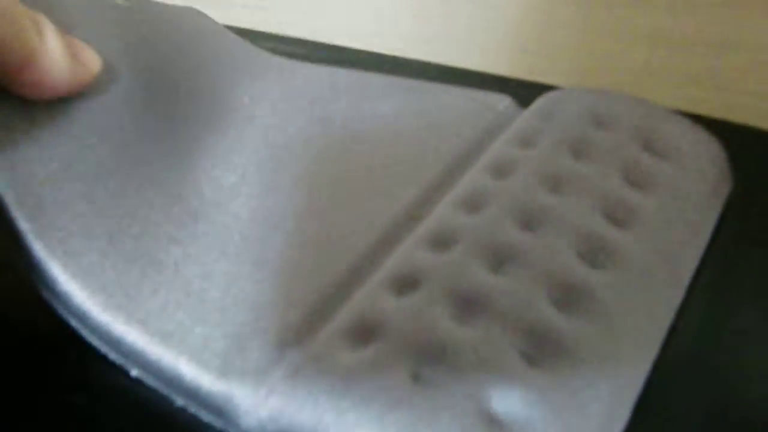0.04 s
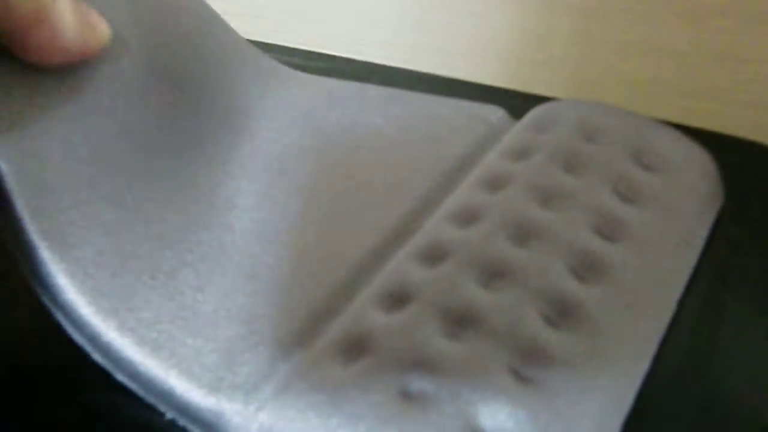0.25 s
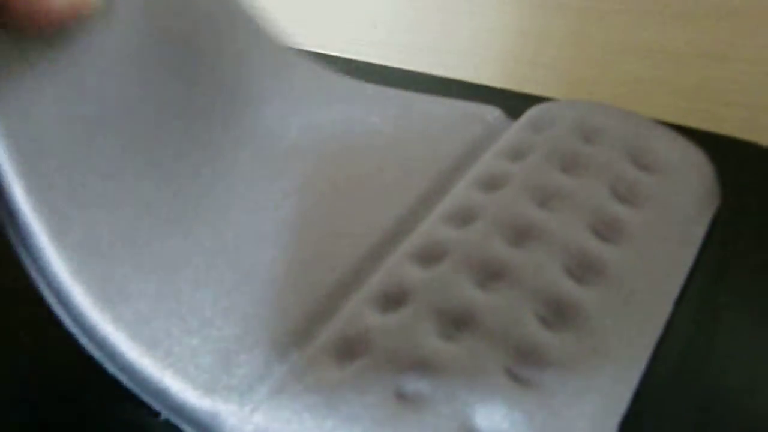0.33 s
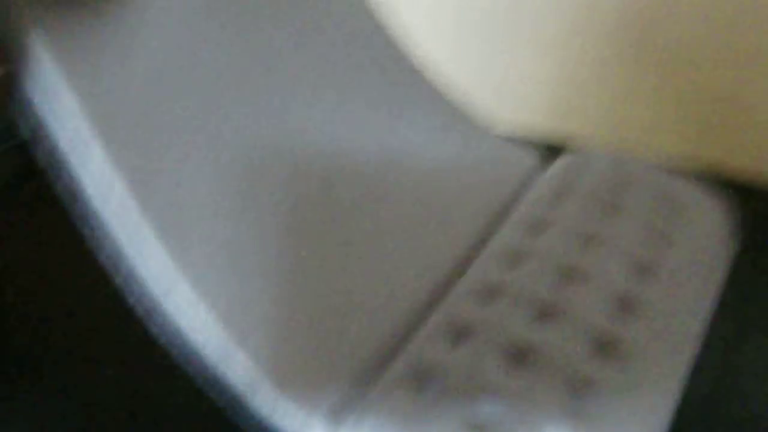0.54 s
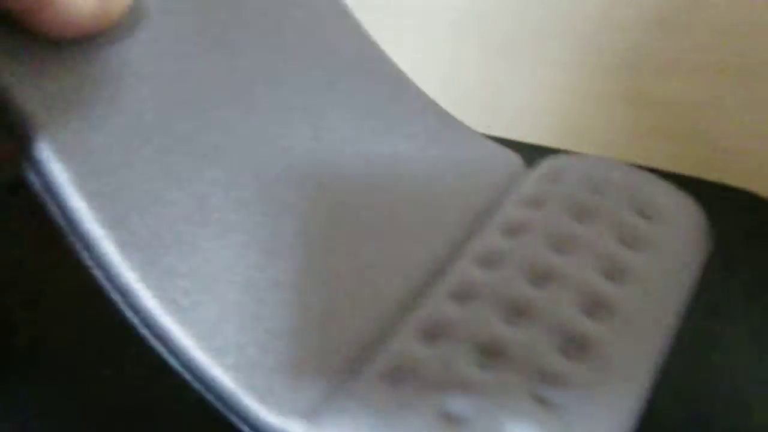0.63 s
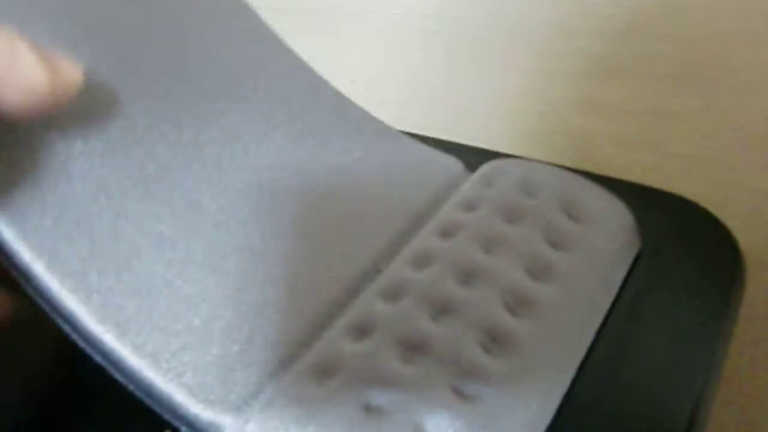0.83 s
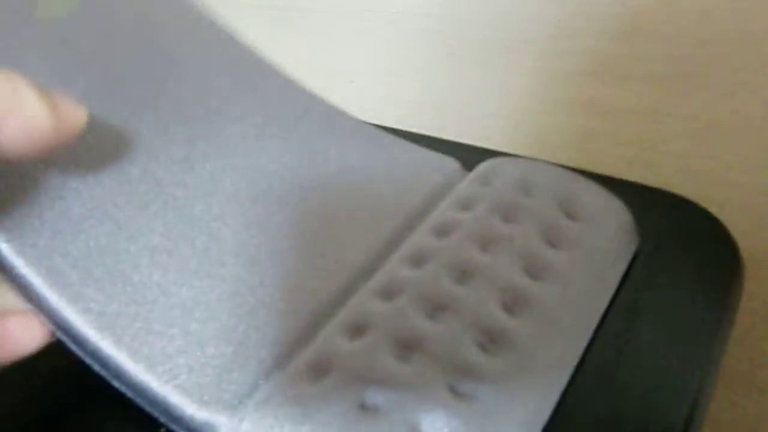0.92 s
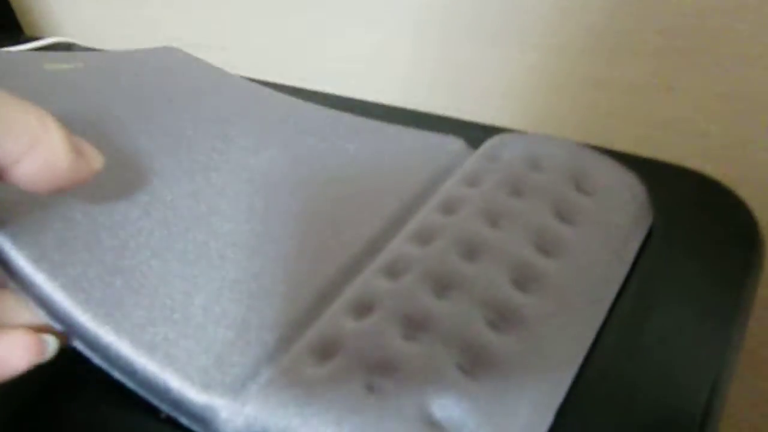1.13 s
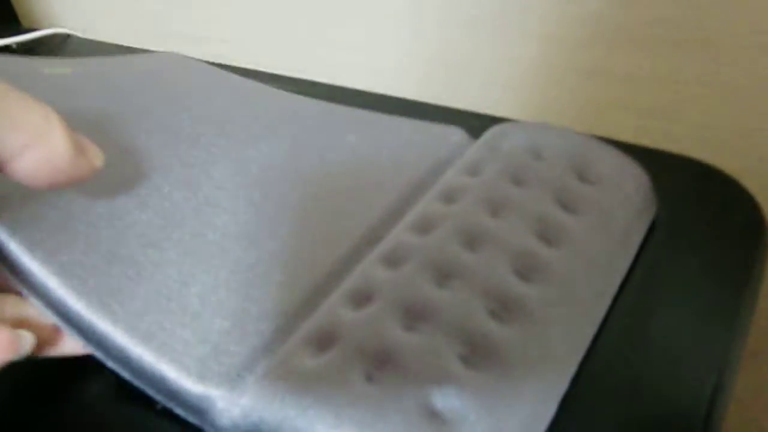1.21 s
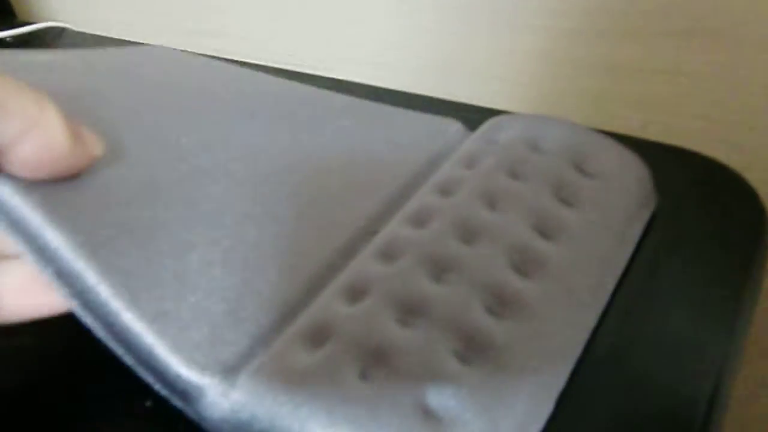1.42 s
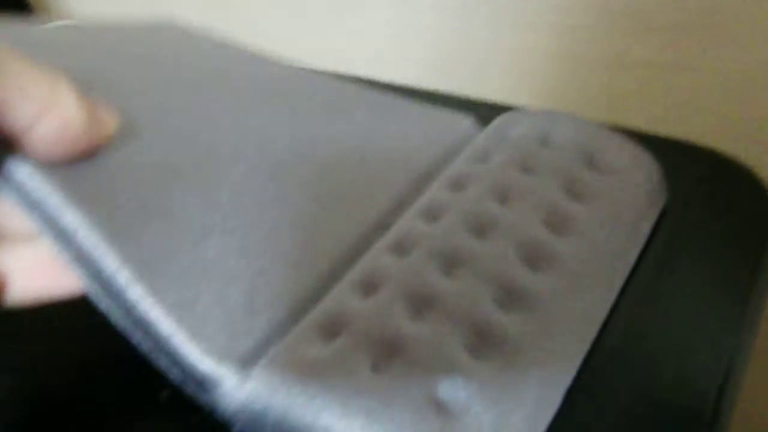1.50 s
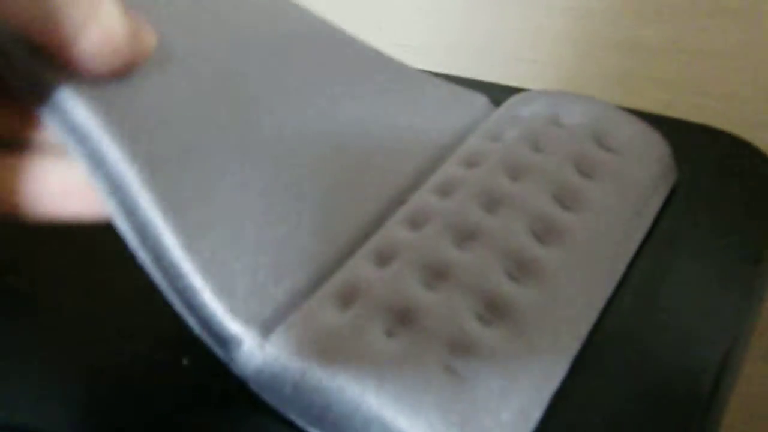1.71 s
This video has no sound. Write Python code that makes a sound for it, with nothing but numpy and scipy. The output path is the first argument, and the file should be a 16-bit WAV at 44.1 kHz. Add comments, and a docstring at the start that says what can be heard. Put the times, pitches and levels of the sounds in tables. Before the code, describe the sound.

A flexible mouse pad ticks as a hand bends it, then buckles with one loud, crackly snap. Faint rustling follows, then a few light taps and a soft thud, close by in a small room with a humming fan.

```python
"""Buckling of a mouse pad.

A hand bends a flexible pad on a desk. Its strained skin ticks, then buckles in a burst of cracks with
one loud snap, and the loose sheet flaps. Friction makes it rustle and faintly squeak; it taps, scuffs
and thuds as it is let down. A small room reverberates, and a fan hums throughout."""
import sys
import numpy as np
from scipy import signal
from scipy.fft import rfft, irfft, next_fast_len
from scipy.io import wavfile
from scipy.ndimage import uniform_filter1d

SR = 44100
rng = np.random.default_rng(int(sys.argv[2]) if len(sys.argv) > 2 else 0)


def output_pcm(signal):
    """Save a mono or channel-first signal as 16-bit PCM at the path in sys.argv[1].

    Samples are clipped to [-1, 1] before scaling.
    """
    pcm = np.clip(np.atleast_2d(signal).T, -1, 1) * 32767
    wavfile.write(sys.argv[1], SR, np.round(pcm).astype(np.int16))


N = 77175


def undb(db):
    """Amplitude ratio of a level in decibels."""
    return 10 ** (np.asarray(db) / 20)


def unit(x):
    """Normalisation to an rms of 1."""
    return x / np.sqrt(np.mean(x ** 2))


def clock(size=N):
    """Sample times in seconds."""
    return np.arange(size) / SR


def add(out, at_s, x):
    """Superposition of a sound from a given time."""
    i = max(int(at_s * SR), 0)
    out[i:i + len(x)] += x[:N - i]


def colour(x, spectrum):
    """Minimum-phase filter through (Hz, dB) points, made by folding the cepstrum."""
    size = next_fast_len(2 * N, True) // 2 * 2
    hz, db = np.array(spectrum, float).T
    f = np.maximum(np.arange(size // 2 + 1) * SR / size, 1)
    gain = undb(np.interp(np.log(f), np.log(hz), db))
    cepstrum = irfft(np.log(gain))
    cepstrum[1:size // 2] *= 2
    cepstrum[size // 2 + 1:] = 0
    return irfft(rfft(x, size) * np.exp(rfft(cepstrum)))[:N]


def wander(rate_hz):
    """Smooth random fluctuation with an rms of 1."""
    hold = int(SR / rate_hz)
    steps = rng.standard_normal(N)[np.arange(N) // hold]
    return unit(uniform_filter1d(uniform_filter1d(steps, hold), hold))


def ring(modes, detune, rise_s=0):
    """Free vibration: damped modes, slightly retuned by bending; a soft push builds up slowly."""
    t = clock(SR // 2)
    x = 0
    for k, (hz, db, t60) in enumerate(modes):
        bent_hz = hz * (1 + detune * rng.standard_normal())
        x += (-1) ** k * undb(db) * np.sin(2 * np.pi * bent_hz * t) * 1000 ** (-t / t60)
    return x * (1 - np.exp(-t / rise_s)) if rise_s else x


def click(trail_db, decay_s):
    """Stick-slip: one impulse and a decaying trail of tiny slips."""
    t = clock(SR // 10)
    slips = rng.standard_normal(len(t)) * undb(3.5 * rng.standard_normal(len(t)))
    trail = slips * np.exp(-t / decay_s)
    x = undb(trail_db) * trail / np.sqrt(np.sum(trail ** 2))
    x[0] -= 1
    return x


# Tones of the fan. Each row: frequency in Hz, level in dB.
FAN_TONES = [(86, -54.5), (173, -63), (231, -58), (256, -56.5), (289, -56), (332, -60.5)]
# Spectrum of its air noise. Each row: frequency in Hz, gain in dB.
AIR_SPECTRUM = [(15, -40), (25, -8.5), (58, -19.5), (70, -6), (92, -4.5), (108, -11), (170, -9), (200, -10),
                (236, 1.5), (285, -13), (335, -3.5), (363, -24.5), (405, -13), (560, -17.5), (734, -15.5),
                (1070, -24.5), (1520, -24), (2000, -28.5), (4030, -28.5), (11000, -37.5), (16000, -41)]
def fan():
    """Tonal and broadband noise: low, wavering tones over a steady flow of air."""
    drift = 1.597 / FAN_TONES[0][0]  # rms fraction of each frequency
    hum = 0
    for hz, db in FAN_TONES:
        cycles = rng.random() + np.cumsum(hz * (1 + drift * wander(25.13))) / SR
        hum += undb(db) * np.sqrt(2) * np.sin(2 * np.pi * cycles) * undb(1.1 * wander(16))
    return hum + undb(-47.5) * unit(colour(rng.standard_normal(N), AIR_SPECTRUM))


# Bands of the room's tail. Each row: centre in Hz, gain in dB, time to fall 60 dB in seconds.
ROOM_BANDS = [(120, -23, 0.68), (302, -2.5, 0.46), (620, -6, 0.43), (1190, -6.5, 0.41), (1660, -6.5, 0.47),
              (3240, -8.5, 0.42), (5300, -15, 0.29), (15000, -11.5, 0.31)]
def room(x, onset_s=0.0044):
    """Reverberation: a diffuse field decays exponentially, the treble sooner than the bass."""
    t = clock()
    noise = rfft(rng.standard_normal(N))
    f = np.maximum(np.arange(N // 2 + 1) * SR / N, 1)
    log_centres = np.log([row[0] for row in ROOM_BANDS])
    tail = 0
    for share, (_, db, t60) in zip(np.eye(len(ROOM_BANDS)), ROOM_BANDS):
        band = irfft(noise * np.interp(np.log(f), log_centres, share), N)
        fade = 1000 ** (-t / t60) * (1 - np.exp(-(t / onset_s) ** 2))
        tail += undb(db) * band * fade / np.sqrt(np.sum(fade ** 2))
    return signal.fftconvolve(x, tail)[:N]


# Envelopes of the friction noises. Each row: time in seconds, level in dB.
RUB_LEVELS = [(0, -65.5), (.22, -48), (.45, -63.5), (.85, -58), (.98, -57.5), (1.1, -60.5), (1.25, -56.5),
              (1.45, -63), (1.75, -58)]  # hand under the pad
BRUSH_LEVELS = [(0, -63), (.2, -63), (.36, -54), (.44, -66), (.54, -61.5), (.6, -67), (.66, -60.5),
                (.78, -66), (.95, -62), (1.15, -72), (1.22, -62), (1.32, -61), (1.42, -68.5), (1.75, -68.5)]  # cloth on skin
RUSTLE_LEVELS = [(0, -53), (.13, -52), (.25, -51.5), (.55, -58.5), (.8, -54.5), (1.1, -58.5), (1.22, -51.5),
                 (1.35, -57), (1.42, -71), (1.56, -74), (1.64, -52), (1.75, -55)]  # hollow midrange rustle
SLIDE_LEVELS = [(0.62, -79), (0.73, -60), (0.83, -59), (0.92, -69), (1.23, -74), (1.35, -76)]  # pad being lowered
# Their spectra. Each row: frequency in Hz, gain in dB.
RUB_SPECTRUM = [(200, 16), (700, -3), (1200, -4.5), (2200, 1.5), (4500, -2.5), (8000, -14), (16000, -7)]
BRUSH_SPECTRUM = [(2000, -15), (6000, -16), (10000, -4), (14000, -7), (16000, -8)]
RUSTLE_SPECTRUM = [(200, -25.5), (400, -1), (560, -4), (740, 3.5), (850, -10.5), (1100, -12.5), (3000, -39)]
SLIDE_SPECTRUM = [(700, -24), (1300, -7), (1600, 0), (1850, -10), (3000, -28)]
def friction():
    """Sliding friction: many slips of uneven size merge into grainy noise."""
    out = np.zeros(N)
    for levels, spectrum in [(RUB_LEVELS, RUB_SPECTRUM), (BRUSH_LEVELS, BRUSH_SPECTRUM),
                             (RUSTLE_LEVELS, RUSTLE_SPECTRUM), (SLIDE_LEVELS, SLIDE_SPECTRUM)]:
        grains = rng.standard_normal(N) * undb(5.3 * rng.standard_normal(N) + 2.1 * wander(90))
        envelope = undb(np.interp(clock(), *np.array(levels).T))
        out += unit(colour(grains, spectrum)) * envelope
    return out


# Course of the squeak. Each row: time in seconds, frequency in Hz, level in dB.
SQUEAK_PATH = [(0.75, 4914, -77), (0.766, 5004, -56), (0.778, 4930, -56), (0.796, 5150, -60),
               (0.81, 5300, -75)]
def squeak():
    """Friction-excited oscillation: one thin tone of unsteady pitch."""
    t = clock()
    at, hz, db = np.array(SQUEAK_PATH).T
    pitch = np.interp(t, at, hz) * (1 + 0.012 * wander(600))
    envelope = undb(np.interp(t, at, db, left=-120, right=-120))
    return np.sqrt(2) * np.sin(2 * np.pi * np.cumsum(pitch) / SR) * envelope


# Swings and soft landings of the sheet. Each row: start in seconds, gain in dB.
FLAPS = [(0.241, -38), (0.291, -29), (0.343, -34), (1.122, -45)]
THUDS = [(0.958, -50), (1.066, -33), (1.118, -41)]
# The modes of each. Each row: frequency in Hz, gain in dB, time to fall 60 dB in seconds.
FLAP_MODES = [(39.6, -1.5, 0.36), (60.3, 0, 0.227), (101, -14.5, 0.11)]
THUD_MODES = [(85.5, 1.5, .16), (120, -8, .11), (194, 1.5, 0.096)]
def loose_sheet():
    """Low bending modes push air as the freed sheet swings and later sags onto the hand."""
    out = np.zeros(N)
    for at, db in FLAPS:
        add(out, at, -undb(db) * ring(FLAP_MODES, detune=0.008, rise_s=0.013))
    for at, db in THUDS:
        add(out, at, undb(db) * ring(THUD_MODES, detune=0.02, rise_s=0.0028))
    return out


# Light contacts. Each row: start in seconds, gain in dB, relative scuff in dB, its decay in seconds.
TAPS = [(0.958, -14, 9.5, 0.0066), (0.9625, -5, 4, 0.0061), (1.0521, -5, -9, 0.0023),
        (1.0592, 0.5, 3, 0.0051), (1.0658, -13, 8, 0.0056), (1.1143, 1.5, 2, 0.0075),
        (1.1852, -0.5, 0, 0.0027)]
# Their spectrum. Each row: frequency in Hz, gain in dB.
TAP_SPECTRUM = [(80, 8), (250, 11), (600, 3), (1150, 8.5), (2000, -4), (3200, -2.5), (4500, 3), (7000, -3),
                (10000, -5), (16000, -9)]
def taps():
    """Impact with slip: the pad settles on the fingers, each contact trailing a short scuff."""
    out = np.zeros(N)
    for at, db, scuff_db, decay_s in TAPS:
        add(out, at, undb(db) * click(scuff_db, decay_s))
    return undb(-14.5) * colour(out, TAP_SPECTRUM)


# Ticks of the pad's skin. Each row: start in seconds, gain in dB, decay in seconds.
TICKS = [(0.044, -8.5, 0.0017), (0.0504, -9, 0.0012), (0.0839, 2, 0.0027), (0.1052, -8, .004),
         (0.114, -7, .003), (0.1535, -9.5, 0.0018), (0.1816, 3, 0.003), (0.1935, -3, 0.0046),
         (0.208, -3, 0.0035), (0.212, -2, .004), (0.225, -3, 0.011), (0.642, -11.5, 0.0017),
         (0.6751, -5.5, .003), (0.900, -8, .003), (0.972, -5, 0.0012), (1.0063, -8, .001),
         (1.0176, -8.5, 0.0015), (1.178, -4, 0.0086), (1.211, -6, 0.01)]
# Their spectrum. Each row: frequency in Hz, gain in dB.
TICK_SPECTRUM = [(500, -31), (2500, -35), (4200, -0.5), (6500, -2.5), (9000, 0), (12000, -10), (16000, -3)]
def ticks():
    """Acoustic emission: the stretching skin releases strain in small, bright clicks."""
    out = np.zeros(N)
    for at, db, decay_s in TICKS:
        add(out, at, undb(db) * click(trail_db=7.5, decay_s=decay_s))
    return undb(-22.5) * colour(out, TICK_SPECTRUM)


# Buckling cracks. Each row: start in seconds, gain in dB, then further gains in dB for the
# fine crinkle, the skin's ring and the body's ring.
CRACKS = [(0.233, -28.5, 12, -10, -18), (0.2360, -14, 1.5, 9, -28), (0.2388, -16, -10, -14, -1),
          (0.2478, -22.5, 6, -6, 5), (0.2492, -16.5, -1, -12, -1), (0.2545, -19, -2, -2, 3),
          (0.2675, -27, 7, -10, -14), (0.2718, -25.5, 3, -12, -19), (0.275, -19, 6.5, 3, -19),
          (0.2796, -17, -8, -14, -8), (0.2832, -4, -3.5, -4, -22), (0.2845, -7.5, -26, -23, -5),
          (0.2867, 1.5, -9, 2.5, -6.5), (0.2878, -8, -4.5, -14, 10.5)]
# Spectra of a crack and its crinkle. Each row: frequency in Hz, gain in dB.
CRACK_SPECTRUM = [(60, -39), (150, -11), (280, -2), (550, -0.5), (1200, 1.5), (2000, -1), (3300, -2),
                  (5000, 1), (6900, -9.5), (7800, -16.5), (16000, -27)]
CRINKLE_SPECTRUM = [(2000, -42), (5000, -25), (7000, 2.5), (10000, -3.5), (16000, -6)]
# Modes of the stiff skin and body. Each row: frequency in Hz, gain in dB, time to fall 60 dB in seconds.
SKIN_MODES = [(4170, -1, 0.0077), (5100, -4, 0.0027), (4930, -3, 0.0048), (6400, -3, 0.0044)]
BODY_MODES = [(275, -9, 0.087), (422, -10, 0.12), (496, -0.5, 0.061), (630, -8.5, 0.041), (787, -12, 0.052),
              (855, 1, .052), (1125, 0, 0.018), (1190, -10, 0.058), (1314, -5.5, 0.033), (1680, -9, 0.047),
              (1905, -2.5, 0.026), (2620, 1.5, 0.024), (3700, 0, 0.012)]
def snap():
    """Buckling frees elastic energy in quick cracks that set the pad's skin and body ringing."""
    cracks, crinkle, skin, body = np.zeros((4, N))
    for at, db, crinkle_db, skin_db, body_db in CRACKS:
        add(cracks, at, undb(db) * click(trail_db=6, decay_s=0.0024))
        add(crinkle, at, undb(db + crinkle_db) * click(trail_db=10.5, decay_s=0.0025))
        add(skin, at, undb(db + skin_db) * ring(SKIN_MODES, detune=0.005))
        add(body, at, undb(db + body_db) * ring(BODY_MODES, detune=0.0052))
    crackle = undb(6.5) * colour(cracks, CRACK_SPECTRUM) + undb(-2.5) * colour(crinkle, CRINKLE_SPECTRUM)
    ringing = undb(-17) * skin + undb(-19) * body
    return crackle, ringing


def scene():
    """Superposition of the nearby pad, the reverberation of its clicks and ringing, and the fan."""
    crackle, ringing = snap()
    clicks = crackle + ticks() + taps()
    reverberation = room(undb(-2) * clicks + undb(-11) * ringing)
    return (clicks + ringing + reverberation + loose_sheet() + squeak() + friction() + fan())[None]


def record(dry):
    """Band limiting: a steep low-pass filter removes the highest treble."""
    cutoff_hz = 15800
    return signal.sosfilt(signal.ellip(10, 0.2, 80, cutoff_hz, fs=SR, output="sos"), dry)


dry = scene()
out = record(dry)
output_pcm(out)
```